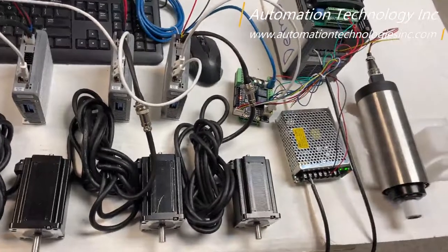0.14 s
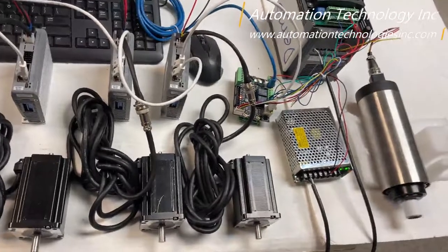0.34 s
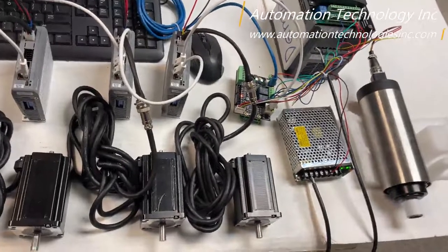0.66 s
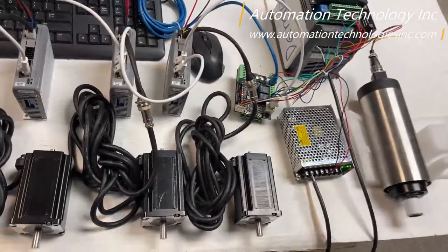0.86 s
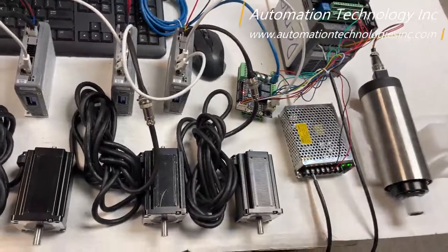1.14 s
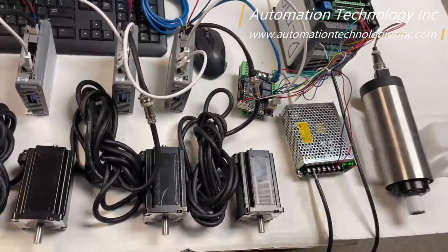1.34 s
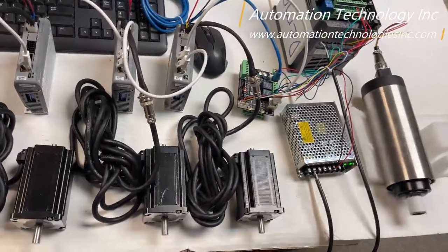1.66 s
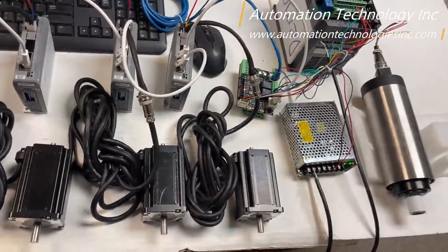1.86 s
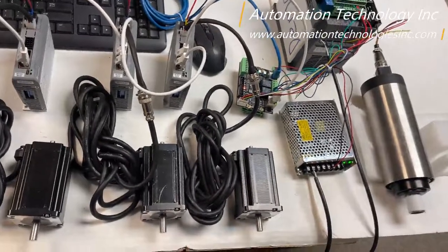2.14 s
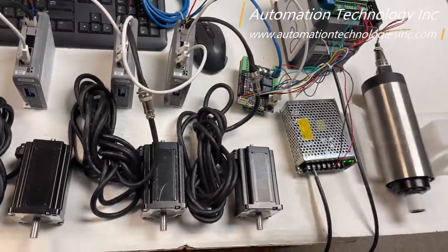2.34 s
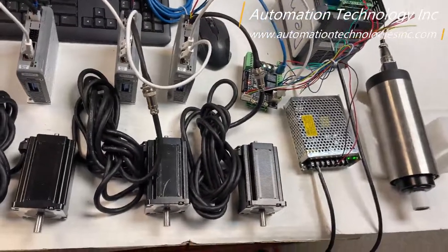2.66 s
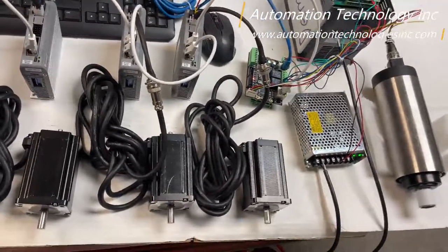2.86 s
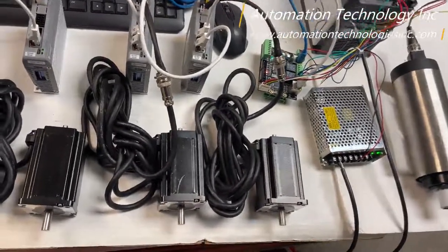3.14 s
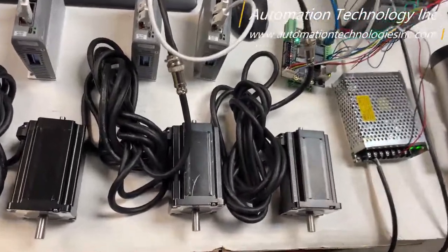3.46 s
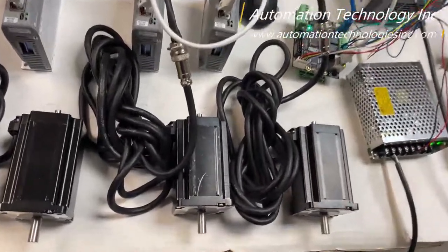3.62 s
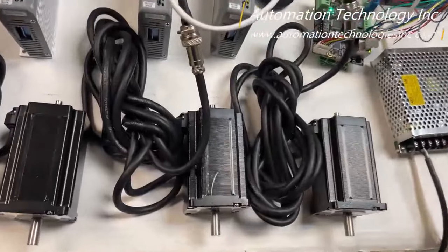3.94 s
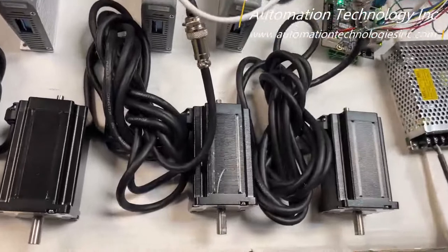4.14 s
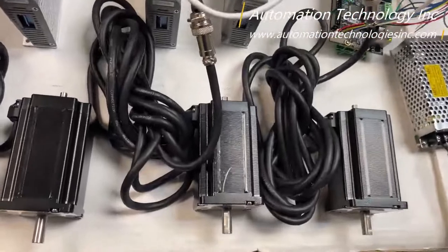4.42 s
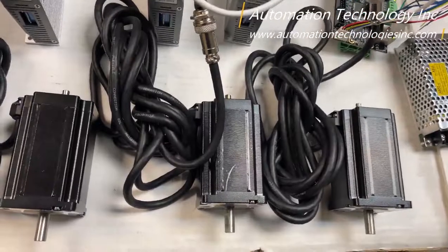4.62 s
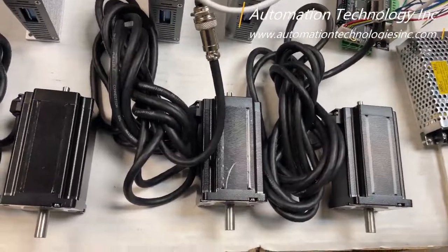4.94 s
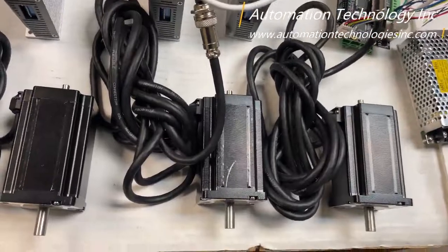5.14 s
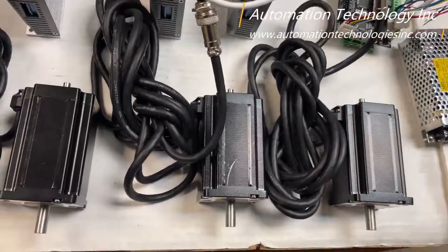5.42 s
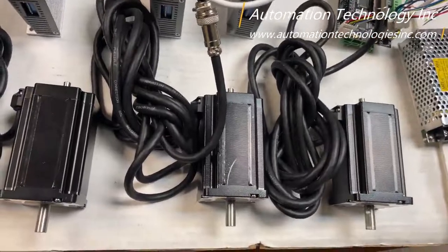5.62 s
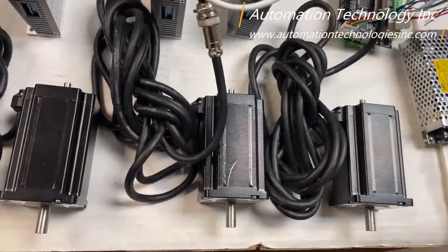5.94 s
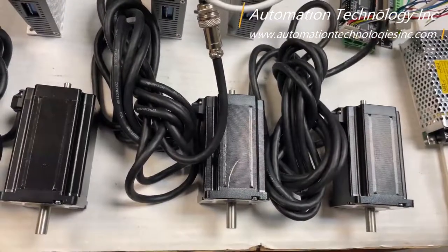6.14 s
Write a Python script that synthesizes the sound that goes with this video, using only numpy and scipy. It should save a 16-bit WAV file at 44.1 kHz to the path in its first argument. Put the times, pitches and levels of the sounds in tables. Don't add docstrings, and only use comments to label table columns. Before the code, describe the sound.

A fast electric spindle motor finishes spinning up, then holds a steady low hum with airy fan hiss, the microphone moving closer halfway through.

```python
import sys
import numpy as np
from scipy import signal
from scipy.fft import rfft, irfft, next_fast_len
from scipy.io import wavfile

SR = 44100
rng = np.random.default_rng(int(sys.argv[2]) if len(sys.argv) > 2 else 0)


def dump(signal):
    limited = np.clip(np.atleast_2d(signal).T, -1, 1)
    pcm = np.round(limited * 32767).astype(np.int16)
    wavfile.write(sys.argv[1], SR, pcm)


def boost(x):
    u = np.asarray(x, float) / 20
    return 10 ** u


N = 276948
CONTROL_HOP = 64
BENCH_HZ, BENCH_WIDTH_HZ = 246.3, 1.5
SPLIT_HZ, TOP_HZ = 2470, 15750

# order, left level/dB, right level/dB, right lead/rad, near left/dB, near right/dB, near lead/rad
STRONG_ORDERS = [(2, -23.6, -22.0, 1.52, -23.5, -23.9, 2.48), (3, -42.2, -42.5, -0.1, -31.9, -37.1, 1.95),
                 (4, -33.5, -34.9, 1.1, -40.7, -35.1, 1.6), (7, -32.0, -37.9, 0.91, -30.4, -31.7, 2.4)]
FAINT_ORDERS = [(5, -48.5, -47.6, 2.04, -53.9, -55.1, -0.81), (6, -49.9, -48.2, 0.39, -44.9, -42.1, 2.53),
                (14, -50.4, -47.2, 1.65, -54.8, -50.9, -0.69),
                (16, -66.1, -54.5, 3.07, -60.2, -56.4, -0.24),
                (35, -78.5, -65.3, -1.92, -85.4, -72.6, -0.22),
                (38, -83.4, -83.3, -0.39, -89.1, -84.3, 2.79)]
RUN_UP_LEAD = [-.5, 1.7, .4, 0]
TURN_POWER = [1.8, 5, 3, .55]
RUN_UP_LEAN = [5, 4, 0, 1]


def rotor(turn, hz, angle, left_db, right_db, lead, order_db):
    shake_db = -0.19
    left_shaft_db = left_db + shake_db * drift(7)
    right_shaft_db = right_db + shake_db * drift(4.9)
    out = pair(turn, left_shaft_db, right_shaft_db, lead)
    past = np.clip((hz - 243) / 11, 0, 1) ** 2
    below = 1 - past
    trail = .1 + .9 * past - .3 * angle
    settings = zip(STRONG_ORDERS, order_db, RUN_UP_LEAD, TURN_POWER, RUN_UP_LEAN)
    for (order, *seen), level_db, extra_lead, late, lean_db in settings:
        left, right, ahead = aspect(seen, angle ** late)
        left = left + lean_db * below / 2
        right = right - lean_db * below / 2
        mean_db = 10 * np.log10((boost(left) ** 2 + boost(right) ** 2) / 2)
        trim_db = level_db - mean_db + 0.21 * drift(7.4)
        phase = round(order) * (turn + trail) + .05 * drift(8.7)
        out += pair(phase, left + trim_db, right + trim_db, ahead + extra_lead * below)
    for order, *seen in FAINT_ORDERS:
        left, right, ahead = aspect(seen, angle)
        out += pair(round(order) * turn + 0.26 * drift(12), left, right, ahead)
    return out


def aspect(seen, share):
    return (1 - share) * np.c_[seen[:3]] + share * np.c_[seen[3:]]


# left level/dB, right level/dB, right lead/rad
SHAFT_FAR = (-10.85, -16.5, -.3)
SHAFT_NEAR = (-10.55, -14.0, .38)
# f/Hz, half width/Hz, level/dB, right lead/rad
LEFT_SPOTS = [
    (252.4, 1.0, .8, -.08),
    (235.6, .6, -1.2, .65),
]


def shaft_levels(hz, near, angle, swell_db, ring_db):
    climb_db = -.7 * np.maximum(BENCH_HZ - hz, 0)
    spot_db, spot_lead = 0, 0
    for spot_hz, width, db, rad in LEFT_SPOTS:
        spot = hump(hz, spot_hz, width, width)
        spot_db, spot_lead = spot_db + db * spot, spot_lead + rad * spot
    left, right, lead = SHAFT_FAR
    near_left, near_right, near_lead = SHAFT_NEAR
    left_db = left + angle * (near_left - left) + swell_db + climb_db + spot_db
    right_db = right + angle * (near_right - right) + .55 * swell_db + climb_db + ring_db
    bench_lead = .75 * ease(-hz, -BENCH_HZ, BENCH_WIDTH_HZ)
    return left_db, right_db, lead + near * (near_lead - lead) + bench_lead + spot_lead


# far level/dB, near level/dB, mid-turn t/s, share of swell, share of ring
ORDER_LEVELS = [
    (-22.6, -23.7, 3.8, .8, 0),
    (-43, -33.6, 2.95, .6, 0),
    (-33.9, -36.8, 3.45, -.2, -.2),
    (-33.4, -30.9, 3.3, 1.6, .7),
]
# f/Hz, half width/Hz, level/dB
SWEPT_MODES = [
    [(473, 5, 3.5), (484, 3, -3), (493, 3, 2), (502, 3, -2)],
    [(720, 10, 16), (740, 4.5, 11)],
    [(950, 25, -7), (985, 7, -10)],
    [(1660, 40, 1.5), (1692, 9, 4), (1712, 16, 8)],
]


def order_levels(s, hz, swell_db, ring_db):
    levels = []
    for (far, close, mid, swell, ring), modes, row in zip(ORDER_LEVELS, SWEPT_MODES, STRONG_ORDERS):
        level = far + (close - far) * ease(s, mid, .17) + swell * swell_db
        level = level + ring * ring_db * ease(hz, BENCH_HZ, BENCH_WIDTH_HZ)
        for mode_hz, width, db in modes:
            level = level + db * hump(row[0] * hz, mode_hz, width, width)
        levels.append(level)
    return levels


# t/s, f/Hz
SPEED = [
    (0, 235.6),
    (.05, 236.5),
    (.2, 245.0),
    (.32, 250.9),
    (.45, 253.45),
    (.74, 254.22),
    (1.5, 254.5),
    (2.9, 254.72),
    (6.28, 255.03),
]


def controls():
    s = np.arange(0, N + CONTROL_HOP, CONTROL_HOP) / SR
    hz = np.interp(s, *np.transpose(SPEED))
    near_from, near_to, move_s = .07, .99, 3.33
    near = np.clip(near_from + (near_to - near_from) * ease(s, move_s, .19), 0, 1)
    angle = ease(s, move_s, .13)
    swell_db = 1.9 * hump(s, 3.63, .3, .43)
    slip = hz[-1] - hz
    rumble_db = .99 * swell_db + .1678 * slip
    hiss_db = swell_db + .1429 * slip
    resonance_s = s[np.argmin(np.maximum(BENCH_HZ - hz, 0))]
    ring_db = 7.5 * np.clip(1 - (s - resonance_s) / .34, 0, 1)
    shaft = shaft_levels(hz, near, angle, swell_db, ring_db)
    orders = order_levels(s, hz, swell_db, ring_db)
    return np.transpose([s, hz, near, angle, rumble_db, hiss_db, *shaft, *orders])


# f/Hz, multiple, waver/rad, left level/dB, right level/dB, near change/dB
WHISTLES = [
    (4292, 4, 1.2, -51, -48, -12),
    (4785, 16, .3, -60, -52, -4),
]


def whistles(turn, near):
    clock = 2 * np.pi * np.arange(N) / SR
    out = 0
    for hz, multiple, waver, left, right, fade in WHISTLES:
        phase = hz * clock + multiple * turn + waver * drift(8)
        out = out + pair(phase, left + fade * near, right + fade * near, 2.8)
    return out


# f/Hz, left level/dB per Hz, right level/dB per Hz
RUMBLE_FAR = [(25, -88, -74), (47, -80, -87), (74, -73, -71.5), (120, -71.5, -73), (190, -70, -71),
              (291, -66.5, -64.5), (378, -76, -64), (463, -60, -62.5), (562, -68, -73), (900, -71, -67.5),
              (1250, -62, -62.5), (1400, -61.5, -65), (1640, -62, -64), (2280, -62.5, -65)]
RUMBLE_NEAR = [(26, -87, -71), (46.7, -89, -85), (77, -74, -74), (123, -73.5, -73.5), (202, -75, -69.5),
               (304, -70.5, -66), (373, -79.5, -70), (460, -68.5, -68), (607, -74, -73),
               (890, -68.5, -68.5), (1150, -66.5, -66), (1400, -65.5, -67.5), (1640, -65.5, -68),
               (2312, -65.4, -68)]
HISS_FAR = [(2560, -66.5, -69.5), (2960, -68.5, -65.5), (3530, -74, -78.5), (3980, -71, -65),
            (5200, -75.5, -77), (5790, -68.5, -64), (6400, -71.5, -73.5), (6900, -74, -74),
            (8400, -77, -77.5), (8670, -82, -70), (9530, -85, -67.5), (10450, -82, -76.5),
            (11900, -80.5, -78.5), (14800, -80.8, -81)]
HISS_NEAR = [(2610, -76, -71), (3150, -72.5, -72), (3740, -75.5, -69.5), (4260, -72, -69.5),
             (5000, -72, -69.5), (5800, -72.5, -67), (6360, -66.5, -68.5), (7030, -72, -79.5),
             (8550, -78, -78), (8740, -79, -73.5), (9680, -85, -68), (10530, -79, -77),
             (12400, -86.5, -87.5), (14800, -88.5, -87)]
# f/Hz, likeness (0-1), right lead/rad
PORTS_FAR = [(60, 0.91, -0.01), (200, 0.65, -0.03), (400, 0.72, 0.02), (620, 0.4, 0.41), (850, 0.45, 0.77),
             (1100, 0.59, 0.48), (1300, 0.67, 0.63), (1500, 0.63, 1.06), (1700, 0.61, 1.36),
             (1900, 0.53, 2.2), (2100, 0.59, 2.17), (2250, 0.54, 2.05), (2400, 0.55, 2.41),
             (2500, 0.25, 3.01), (2600, 0.4, 3.21), (3150, 0.93, 3.17), (3600, 0.58, 1.89),
             (4000, 0.43, 3.31), (4350, 0.45, 5.31), (5200, 0.83, 3.24), (5900, 0.35, 1.8),
             (7000, 0.39, 0.92), (8000, 0.62, 3.07), (9000, 0.64, 3.98), (10200, 0.54, 5.6),
             (11700, 0.97, 6.28), (13000, 0.52, 7.18), (14200, 0.96, 9.38)]
PORTS_NEAR = [(60, 0.9, -0.02), (200, 0.63, 0.19), (400, 0.46, 0.59), (620, 0.4, 1.16), (850, 0.68, 1.39),
              (1100, 0.55, 1.37), (1300, 0.65, 1.61), (1500, 0.71, 2.39), (1700, 0.76, 2.58),
              (1900, 0.64, 2.92), (2100, 0.54, 3.54), (2250, 0.28, 3.8), (2400, 0.38, 5.2),
              (2500, 0.31, 5.9), (2600, 0.27, 6.6), (3100, 0.68, 9.2), (3700, 0.55, 11.49),
              (4500, 0.92, 12.62), (4950, 0.29, 12.52), (5300, 0.69, 9.7), (5800, 0.51, 10.0),
              (6300, 0.77, 13.03), (7200, 0.33, 13.85), (8300, 0.79, 15.6), (9600, 0.25, 17.93),
              (11700, 1.0, 18.85), (13000, 0.18, 20.04), (14200, 0.99, 21.98)]
# f/Hz, width/Hz, far level/dB, near level/dB
CASING = [(270, 40, -6, -3), (493, 19, -1, 5.5), (757, 186, 8.5, 11.5), (1050, 27, 1, -3),
          (1640, 280, 2, 3)]


def airflow(turn, near, rumble_db, hiss_db):
    far_share, near_share = np.sqrt(1 - near), np.sqrt(near)
    casing = np.array(CASING)
    rumble = far_share * coloured(RUMBLE_FAR, PORTS_FAR, 14, SPLIT_HZ, casing[:, [0, 1, 2]])
    rumble += near_share * coloured(RUMBLE_NEAR, PORTS_NEAR, 19, SPLIT_HZ, casing[:, [0, 1, 3]])
    hiss = far_share * coloured(HISS_FAR, PORTS_FAR, SPLIT_HZ, TOP_HZ)
    hiss += near_share * coloured(HISS_NEAR, PORTS_NEAR, SPLIT_HZ, TOP_HZ)
    throb = 1 + (.05 + .08 * near) * np.cos(turn + 2.5) + .05 * np.cos(2 * turn)
    rumble_gain = boost(rumble_db + .3 * drift(8))
    hiss_gain = boost(hiss_db + .2 * drift(20))
    return throb * (rumble_gain * rumble + hiss_gain * hiss)


def coloured(colour, ports, low_hz, high_hz, peaks=()):
    size = next_fast_len(N)
    f = np.arange(size // 2 + 1) * SR / size + 1e-3
    left_db, right_db = on_log(f, colour)
    alike, lead = on_log(f, ports)
    alike = alike ** .85
    peak_db = sum(db / (1 + (2 * (f - hz) / width) ** 2) for hz, width, db in peaks)
    gain = boost(peak_db) * (f >= low_hz) * (f < high_hz)
    dull = 1 / (1 + (f / 4000) ** 2)
    delays = rng.uniform(.002, .03, 5)
    comb = sum(np.exp(-2j * np.pi * f * s) for s in delays)
    echoes = 1 + boost(-14) * dull * comb
    noise = rfft(rng.standard_normal((2, size))) * np.sqrt(SR / 2)
    first, second = noise * gain * echoes
    right = alike * np.exp(1j * lead) * first + np.sqrt(1 - alike ** 2) * second
    return irfft(np.array([boost(left_db) * first, boost(right_db) * right]), size)[:, :N]


def jet():
    band = signal.butter(2, [5000, 6300], "band", fs=SR, output="sos")
    air = signal.sosfilt(band, rng.standard_normal((2, N)))
    opposed = .9
    air[1] = np.sqrt(1 - opposed ** 2) * air[1] - opposed * air[0]
    crossing = boost(-39) * hump(np.arange(N) / SR, 3.5, .22, .32)
    pan_db = np.array([[2.5], [-2.5]]) / 2
    return crossing * unit(air) * boost(pan_db)


# t/s, f/Hz
HUM_SPEED = [
    (2.05, 74),
    (2.6, 79),
    (3.1, 79.5),
    (3.6, 72),
    (4.25, 70),
    (5.2, 69.5),
    (5.45, 71.5),
    (5.95, 71.5),
    (6.28, 76),
]
# t/s, fundamental level/dB, octave level/dB
HUM_LOADS = [
    (2.15, -53, -53),
    (4.15, -61, -56.5),
    (5.33, -56.5, -51),
    (6.03, -57, -62),
]


def drive_hum():
    s = np.arange(N) / SR
    hz, = in_time(HUM_SPEED)
    loads, idle_db = np.array(HUM_LOADS), -68
    changes = np.diff(loads[:, 1:], axis=0, prepend=idle_db).T
    low_db, octave_db = idle_db + changes @ ease(s, loads[:, :1], .04)
    third_db = octave_db + 1.63 * drift(3)
    angle = 2 * np.pi * np.cumsum(hz) / SR
    hum = pair(angle, low_db, low_db, 0.13)
    hum += pair(2 * angle, octave_db, octave_db, .2)
    hum += pair(3 * angle, third_db, third_db, .2)
    on = np.clip((s - HUM_SPEED[0][0]) / .1, 0, 1)
    buzz_db = -54 + 1.5 * drift(4.5)
    return on * hum + pair(2 * np.pi * 302.6 * s, buzz_db, buzz_db, .3)


def pair(angle, left_db, right_db, lead):
    left = boost(left_db) * np.cos(angle)
    right = boost(right_db) * np.cos(angle + lead)
    return np.sqrt(2) * np.array([left, right])


def drift(rate):
    r = np.exp(-2 * np.pi * rate * CONTROL_HOP / SR)
    count = N // CONTROL_HOP + 2
    noise = rng.standard_normal(2 * count)
    slow = unit(signal.lfilter([1], [1, -2 * r, r * r], noise)[count:])
    return np.interp(np.arange(N) / CONTROL_HOP, np.arange(count), slow)


def unit(x):
    return x / np.sqrt(np.mean(x ** 2))


def in_time(rows):
    s, *columns = np.transpose(rows)
    return [np.interp(np.arange(N) / SR, s, c) for c in columns]


def on_log(f, table):
    hz, *columns = np.transpose(table)
    return [np.interp(np.log(f), np.log(hz), c) for c in columns]


def ease(x, middle, scale):
    return .5 + .5 * np.tanh((x - middle) / scale / 2)


def hump(x, top, rise, fall):
    return np.exp(-.5 * ((x - top) / np.where(x < top, rise, fall)) ** 2)


def scene():
    hz, near, angle, rumble_db, hiss_db, left_db, right_db, lead, *order_db = in_time(controls())
    turn = 2 * np.pi * np.cumsum(hz) / SR
    out = rotor(turn, hz, angle, left_db, right_db, lead, order_db)
    out = out + whistles(turn, near)
    out = out + airflow(turn, near, rumble_db, hiss_db)
    return out + jet() + drive_hum()


def roll_off(x):
    return signal.sosfilt(signal.butter(12, 15750, fs=SR, output="sos"), x)


def record(dry):
    early_db = 1.18 * ease(-np.arange(N) / SR, -.72, .008)
    mix = dry * boost(early_db)
    return roll_off(mix)


dry = scene()
out = record(dry)
dump(out)
```